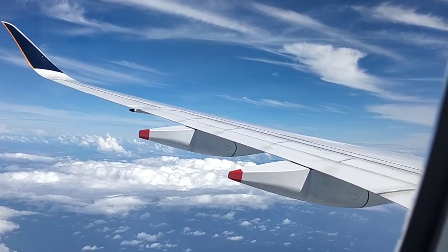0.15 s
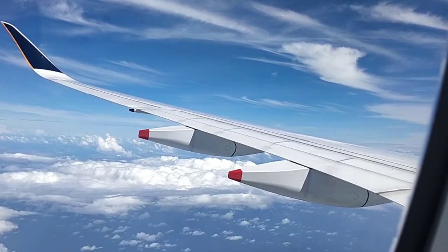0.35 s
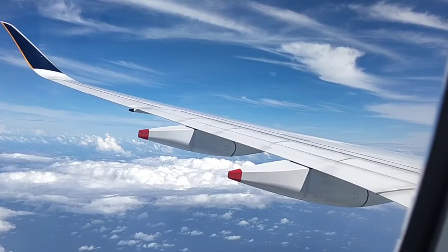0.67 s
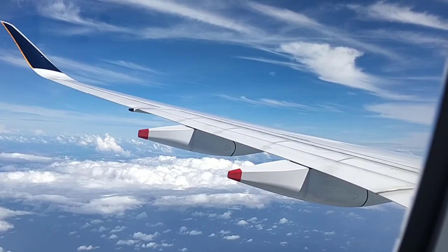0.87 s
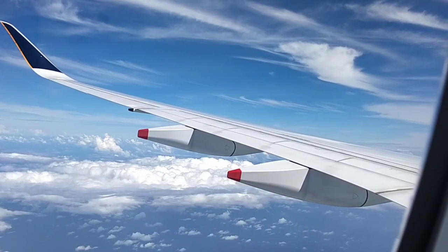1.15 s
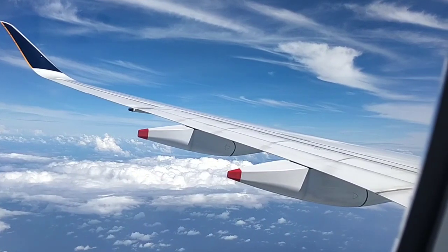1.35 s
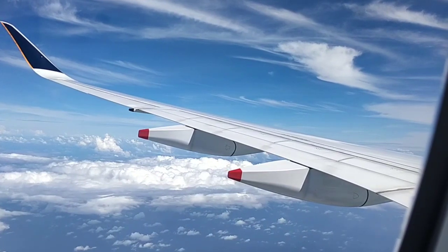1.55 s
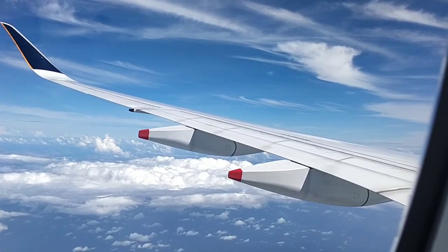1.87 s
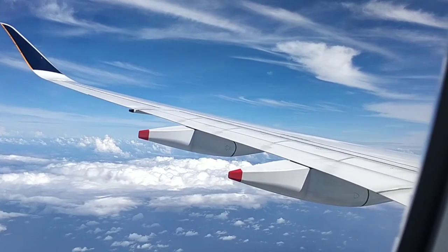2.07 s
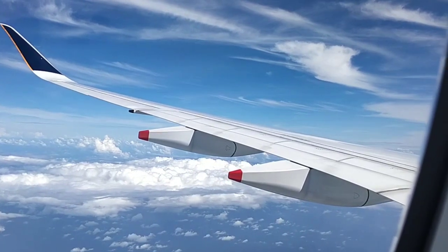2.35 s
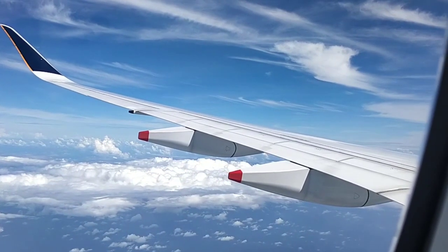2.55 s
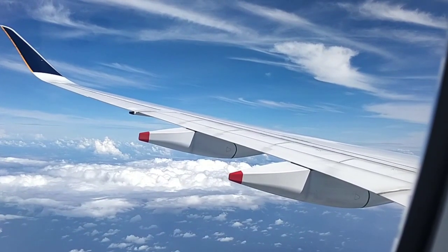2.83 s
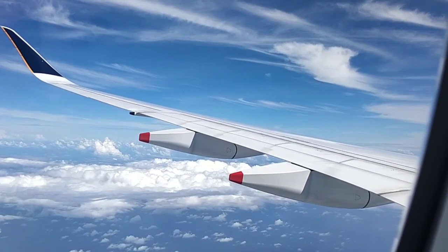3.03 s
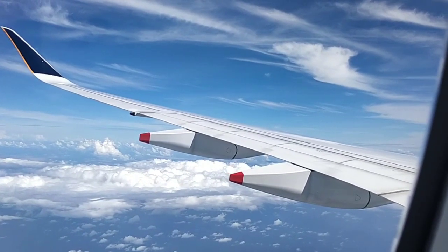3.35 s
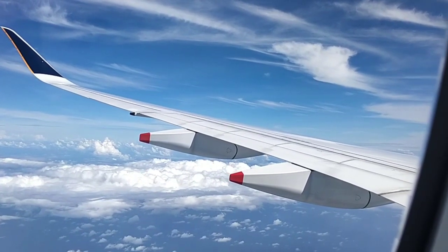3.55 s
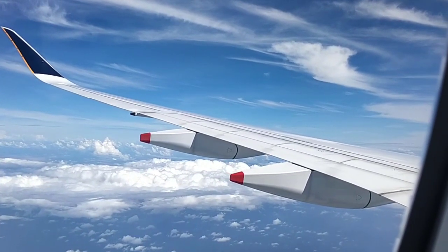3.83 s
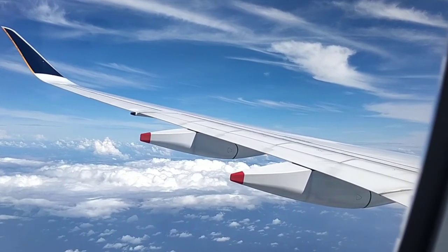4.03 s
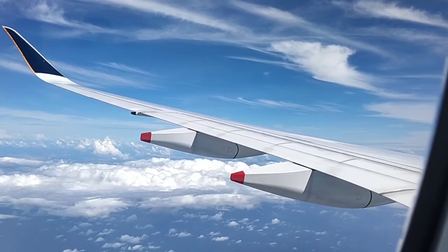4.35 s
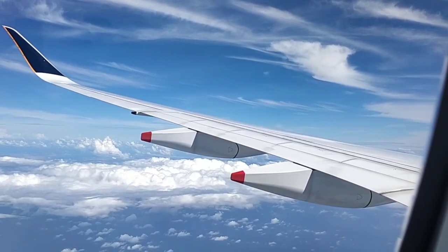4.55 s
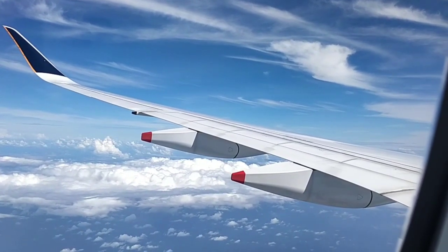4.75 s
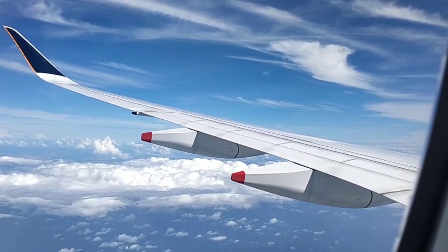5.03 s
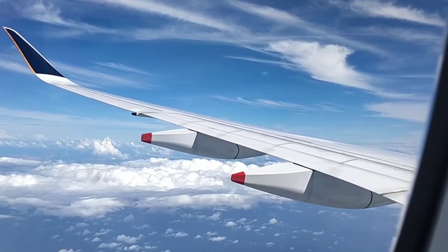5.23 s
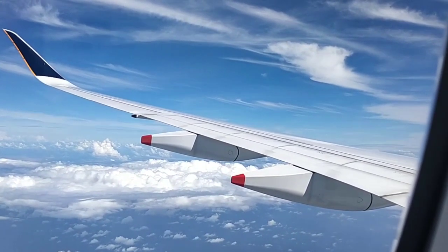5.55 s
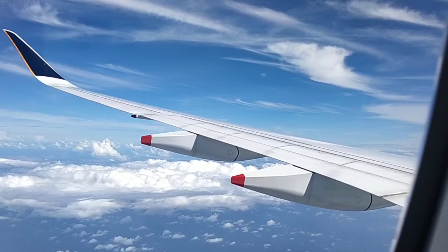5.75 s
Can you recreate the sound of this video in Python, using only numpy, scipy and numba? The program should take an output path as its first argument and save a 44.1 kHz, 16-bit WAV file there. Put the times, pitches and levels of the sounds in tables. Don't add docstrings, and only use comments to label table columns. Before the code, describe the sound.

Steady deep jet rumble booms inside an airliner cabin, with muffled airflow roar past the window and a faint, fluttering vent hiss.

```python
import sys
import numpy as np
from scipy import signal
from scipy.fft import rfft, irfft, next_fast_len
from scipy.io import wavfile
from scipy.ndimage import uniform_filter1d, minimum_filter1d, map_coordinates
from numba import njit

SR = 44100
rng = np.random.default_rng(int(sys.argv[2]) if len(sys.argv) > 2 else 0)


def invert_db(x):
    u = np.asarray(x, float) / 20
    return 10 ** u


def int16_out(signal):
    q = np.round(np.clip(np.atleast_2d(signal).T, -1, 1) * 32767)
    wavfile.write(sys.argv[1], SR, q.astype(np.int16))


N = 259749


def unit(x):
    return x / np.sqrt(np.mean(x ** 2) + 1e-20)


def wobble(rate):
    knots = rng.standard_normal(int(N * rate / SR) + 4)
    return map_coordinates(knots, [np.arange(N) * rate / SR])


def swell(start_s, rise_s):
    u = np.clip((np.arange(N) / SR - start_s) / max(rise_s, .002), 0, 30)
    return u * np.exp(1 - u)


def rush(spectrum, modes=(), patchy_db=0, bins=6, frames=6):
    z = signal.stft(rng.standard_normal(N + SR // 10), nperseg=512)[2]
    field = uniform_filter1d(rng.standard_normal(z.shape), round(bins), 0)
    field = uniform_filter1d(field, round(frames), 1)
    noise = signal.istft(z * invert_db(patchy_db * unit(field)), nperseg=512)[1]
    m = next_fast_len(len(noise))
    hz = np.fft.rfftfreq(m, 1 / SR)
    f, db = np.transpose(spectrum)
    shape_db = np.interp(np.log(hz + 1), np.log(f + 1), db, left=-120, right=-120)
    for centre, width, lift_db in modes:
        shape_db = shape_db + lift_db / (1 + (2 * (hz - centre) / width) ** 2)
    return unit(irfft(rfft(noise, m) * invert_db(shape_db), m)[:N])


def puffs(events, rise_s, spectrum):
    envelope = sum(invert_db(db) * swell(s, rise_s) for s, db in events)
    return envelope * rush(spectrum)


# (time [s], level [dB])
DRIFT = [(0, -40), (.4, -42.5), (.7, -39), (1.2, -40.5), (1.5, -41.5), (2.1, -38), (2.35, -42),
         (2.8, -38.5), (2.95, -42.5), (3.8, -42), (4.4, -40.5), (4.6, -42), (5, -41), (5.45, -40.5),
         (5.89, -41.5)]
# (time [s], lift [dB])
EDDIES = [(.05, -0.5), (.19, 3), (.345, 1.5), (0.521, 3), (.87, 2.5), (1.1, 1.5), (1.42, 4), (2.03, 1),
          (2.13, -1), (2.6, 2.5), (2.74, 3), (2.835, 0), (3.02, 2), (3.239, 1), (3.47, 1.5), (3.84, 1.5),
          (4.04, 3), (4.29, 4), (4.63, 2.5), (4.85, 3.5), (4.97, 4.5), (5.15, 0.5), (5.33, 1.5),
          (5.668, 3.5)]
# (start [s], dip [dB])
DIPS = [(.26, -2.5), (.92, -0.5), (1.32, -3), (1.46, -2), (2.2, -3), (2.53, -3.5), (2.86, -3),
        (3.51, -1.5), (3.731, -2), (4.22, -1), (4.5, -2.5), (5.2, -4.5), (5.245, -4.5), (5.695, -5)]


def turbulence():
    eddy_s, dip_s = .025, .019
    t = np.arange(N) / SR
    drift_s, drift_db = np.transpose(DRIFT)
    level_db = np.interp(t, drift_s, drift_db)
    eddies_db = sum(db * np.exp(-((t - s) / eddy_s) ** 2) for s, db in EDDIES)
    dips_db = sum(db * swell(s, dip_s) for s, db in DIPS)
    return level_db + eddies_db + dips_db


# (frequency [Hz], level [dB per Hz])
JET_RUMBLE = [(8.8, -48.5), (15, -20), (92, -4.5), (123, -2.5), (152, -2), (227, -8.5), (279, -13.5),
              (330, -17.5), (430, -52.5), (730, -120)]
# (frequency [Hz], width [Hz], lift [dB])
CABIN_MODES = [(39.2, 5.4, 9.5), (75, 22, 1.5), (101.5, 15, 6), (119, 18, -3.5), (152.2, 14, 3.5),
               (176.7, 68, 4.5), (223.8, 20, 3.5)]
# (frequency [Hz], level [dB per Hz])
WALL_HUM = [(150, -36.5), (260, -0.5), (280, -6.5), (329, 0.5), (517, -14), (713, -15), (785, -15.5),
            (1000, -28.5), (1300, -52), (2200, -120)]
# (frequency [Hz], width [Hz], lift [dB])
PANEL_MODES = [(315, 33, 1), (397, 7.7, 4.5), (430, 12, 2), (486.4, 11, 2.5), (625, 98, 5), (717, 60, 4.5),
               (707, 24, 3.5)]


def hull(swing_db):
    boom_db = -14.5 + .25 * swing_db
    wall_db = -28 + .45 * swing_db + 1.1 * wobble(14)
    boom = invert_db(boom_db) * rush(JET_RUMBLE, CABIN_MODES)
    return boom + invert_db(wall_db) * rush(WALL_HUM, PANEL_MODES, patchy_db=-0.64)


# (frequency [Hz], level [dB per Hz])
WINDOW_ROAR = [(500, -32.5), (850, -1), (1150, -6), (1250, -5.5), (1770, -10), (2050, -9), (2450, -12),
               (3000, -21), (3460, -26.5), (4000, -31), (4800, -46), (7000, -120)]


def slipstream(slip_db, swing_db, flutter):
    body_hz, body_follows = 1500, .6
    roar = rush(WINDOW_ROAR, [(2020, 140, 1.6)], patchy_db=1.06, bins=14, frames=5)
    body = signal.sosfiltfilt(signal.butter(2, body_hz, fs=SR, output="sos"), roar)
    edge = invert_db(0.6 * flutter) * (roar - body)
    return invert_db(slip_db) * (invert_db((body_follows - 1) * swing_db) * body + edge)


# (frequency [Hz], level [dB per Hz])
VENT_HISS = [(2500, -30), (4000, -5), (4800, -3), (6300, -2.5), (7300, -3), (8000, 2), (8800, -5.5),
             (10000, -5.5), (11800, -13), (13500, -7), (14500, -7.5), (15350, -3), (15600, -3),
             (16000, -120)]


def vents(swing_db, flutter):
    level_db = -64.5 + 1.3 * swing_db
    gusts = invert_db(0.7 * flutter + 0.47 * wobble(58))
    return invert_db(level_db) * gusts * rush(VENT_HISS, patchy_db=2.0, bins=70, frames=2)


# (time [s], peak [dB])
RUSTLES = [(.669, -60), (.862, -59), (.882, -61), (1.403, -68), (2.0278, -58), (2.596, -60), (2.818, -58),
           (3.0959, -66), (4.062, -66), (4.283, -59), (4.31, -61), (4.612, -61), (4.727, -60), (5.795, -65)]


def trim():
    colour = [(2500, -14.5), (5000, -14.5), (6000, -2.5), (6900, -14.5), (12000, -27.0)]
    return puffs(RUSTLES, .008, colour)


# (time [s], peak [dB])
SPITS = [(.34, -59), (.7033, -60), (.782, -59.5), (.8625, -67.5), (1.0915, -58), (1.8, -64), (1.96, -60.5),
         (2.023, -63.5), (2.1285, -60), (2.65, -61.5), (2.8765, -66), (3.0006, -54), (3.6053, -61),
         (3.817, -68), (4, -62), (4.285, -58), (4.4628, -61.5), (4.8848, -57.5), (5.1218, -59),
         (5.3114, -62), (5.496, -58.5)]


def nozzle():
    colour = [(2000, -39.5), (3000, -7.5), (7000, -8.5), (11000, -3.5), (14000, -5.5), (15600, -0.5)]
    return puffs(SPITS, .004, colour)


def flicker():
    per_s, level_db, spread_db, rise_s = 26, -64.5, 2.2, .0028
    rows = rng.random((round(per_s * N / SR), 2))
    moments = (rows[:, 0] * N).astype(int)
    peaks_db = level_db - spread_db * np.log(rows[:, 1] + 1e-3)
    kicks = np.bincount(moments, invert_db(peaks_db), N)
    u = np.arange(SR // 20) / SR / rise_s
    envelope = signal.fftconvolve(kicks, u * np.exp(1 - u))[:N]
    return envelope * rush([(1800, -31.5), (2600, 3.5), (4500, -4.5), (8000, -5.5), (11500, -7), (15600, -2.5)])


def fizz(swing_db):
    level_db = -73.5 + 1.5 * swing_db + 3.5 * wobble(16)
    colour = [(8000, -24), (9500, -4.5), (11800, -4.5), (13500, -3), (15600, 2)]
    return invert_db(level_db) * rush(colour, patchy_db=1.5, bins=40, frames=4)


def scene():
    slip_db = turbulence()
    swing_db = slip_db - slip_db.mean()
    flutter = wobble(35)
    air = slipstream(slip_db, swing_db, flutter) + vents(swing_db, flutter)
    return (hull(swing_db) + air + trim() + nozzle() + flicker() + fizz(swing_db))[None]


@njit
def recover(need, step):
    gain = need.copy()
    for i in range(1, len(gain)):
        gain[i] = min(need[i], gain[i - 1] + step * (1 - gain[i - 1]))
    return gain


# (frequency [Hz], threshold [spreads of a random field])
DROPOUTS = [(4000, -2.6), (8500, -2.0), (9500, -1.1), (12500, -.5), (14500, -.9), (15600, -1.7)]


def starve(x, depth_db):
    hz, _, z = signal.stft(x, SR, nperseg=1024)
    field = uniform_filter1d(rng.standard_normal(z.shape), size=7, axis=-2)
    field = uniform_filter1d(field, size=4, axis=-1)
    f, edge = np.transpose(DROPOUTS)
    dropped = unit(field) < np.interp(hz, f, edge, left=-9)[:, None]
    return signal.istft(z * invert_db(depth_db * dropped), SR, nperseg=1024)[1][..., :N]


def roll_off(x):
    return signal.sosfilt(signal.butter(12, 15520, fs=SR, output="sos"), x)


def record(dry):
    top, ahead, release_s = .5, 130, .03
    need = np.minimum(1, top / (np.abs(dry[0]) + 1e-9))
    gain = recover(minimum_filter1d(need, size=2 * ahead + 1), 1 / (release_s * SR))
    held = dry * uniform_filter1d(gain, size=ahead)
    mix = starve(held, depth_db=-30)
    return roll_off(mix)


dry = scene()
out = record(dry)
int16_out(out)
```